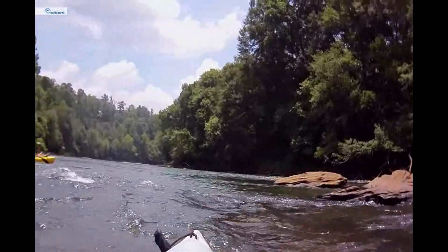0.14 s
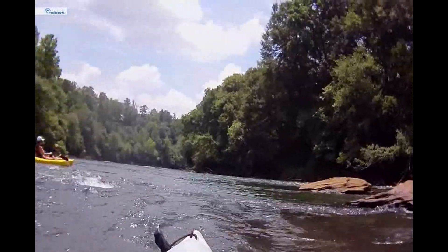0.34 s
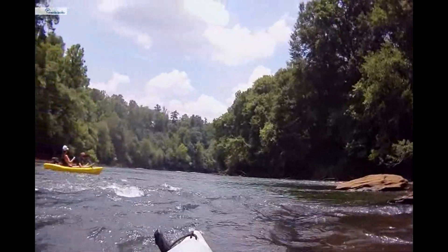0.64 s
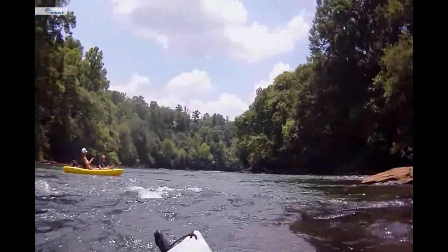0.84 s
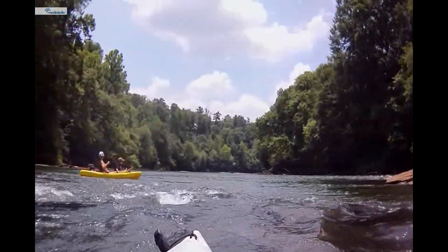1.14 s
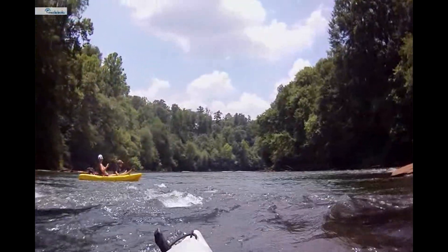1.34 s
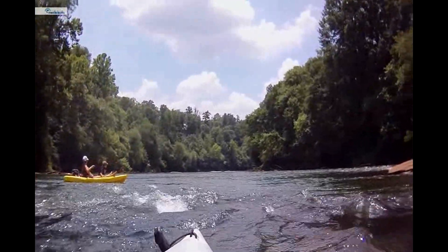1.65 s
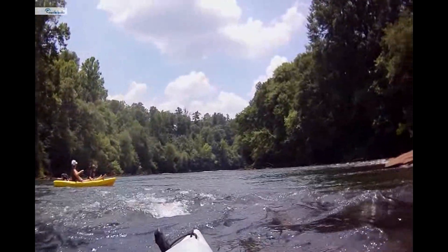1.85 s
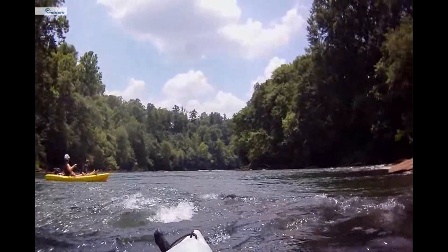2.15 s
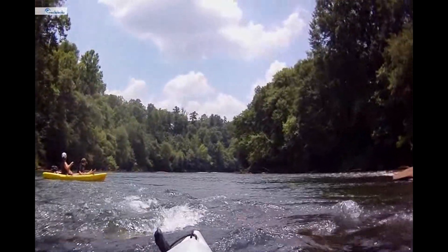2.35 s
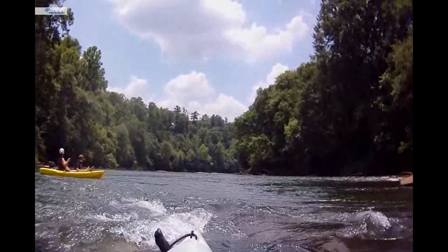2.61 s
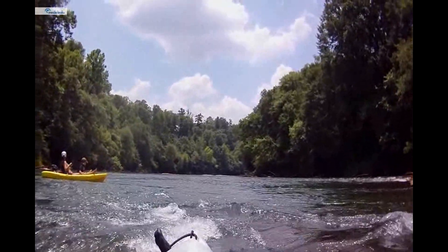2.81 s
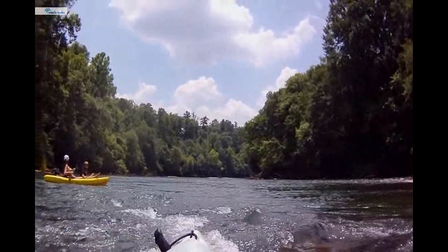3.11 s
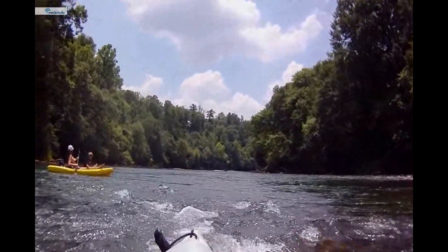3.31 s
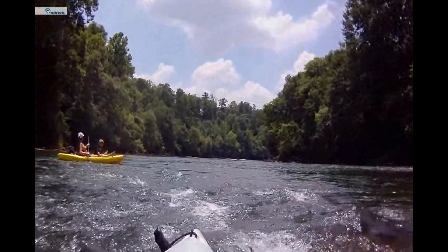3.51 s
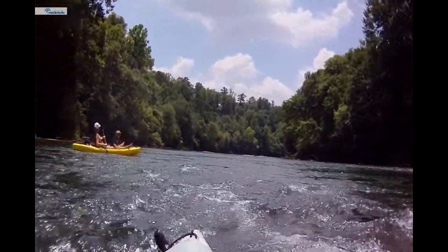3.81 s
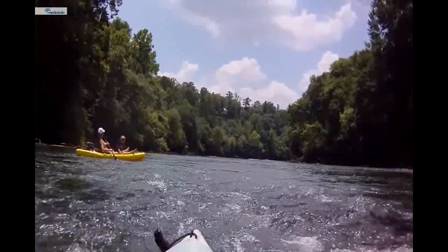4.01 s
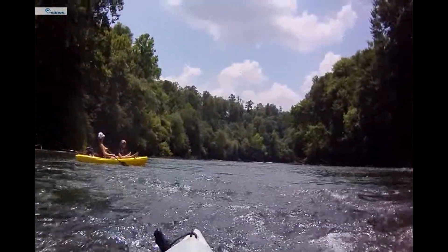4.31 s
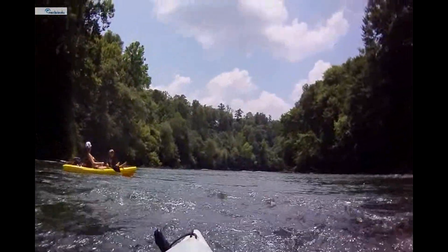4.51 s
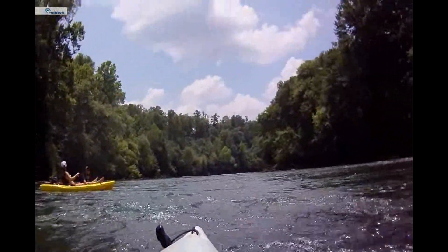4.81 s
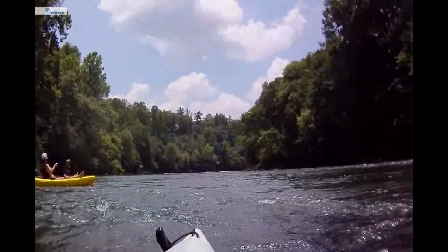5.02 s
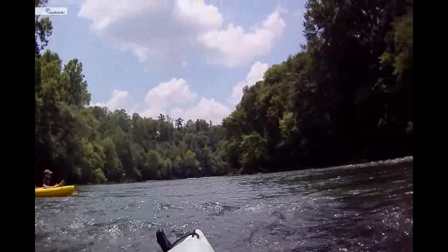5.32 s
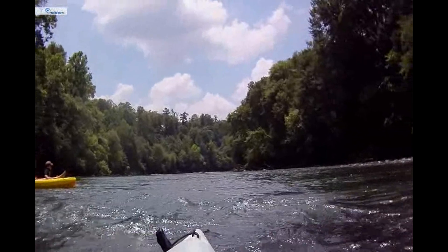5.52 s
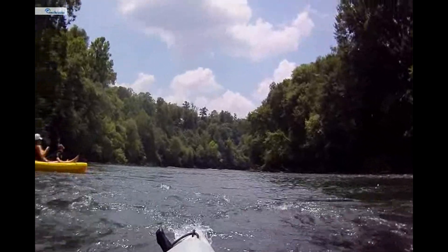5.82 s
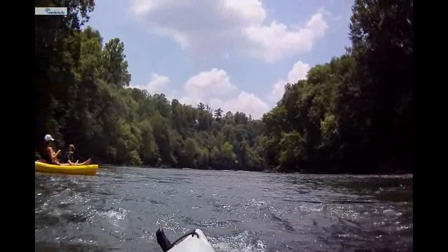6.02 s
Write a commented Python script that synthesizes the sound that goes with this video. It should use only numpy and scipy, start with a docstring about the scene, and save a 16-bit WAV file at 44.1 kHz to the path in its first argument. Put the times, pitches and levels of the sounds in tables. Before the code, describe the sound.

Outdoors on a river, a microphone in a sealed plastic case rides on a kayak deck. Throughout, a soft boxy wash of bubbling water and finer fizz runs over a low, surging rumble, with very faint hiss. At first it is fairly calm, with a few drips and a short slap and gurgle near 0.7 s. A flurry of plinking drops, slaps and gurgles comes around 1.1-1.4 s, then scattered drips and gurgles to 3 s. The fizz grows rougher and brighter, strongest around 4 s, with a deep double hull slap at about 4.2 s. At 4.8-4.95 s something hard chatters against the case: a rapid run of dry cracks, pings and boxy knocks over a low hull shudder, peaking near 4.87 s, by far the loudest event. Calmer water returns, with high glassy drips clustering around 5.4-5.6 s, and a final gurgle near 6.1 s.

```python
"""Water washes and fizzes over a low rumble, then drips, slaps and gurgles as a kayak drifts through rapids.
Wash and fizz mix drifting noise with crowds of bubbles; drops, slaps and gurgles are dying tones.
Late on, something hard chatters and knocks against the sealed plastic case of the microphone on the deck:
cracks, pings and boxy rings over a shudder of the hull. A faint hiss runs throughout."""
import sys
import numpy as np
from scipy import signal
from scipy.fft import rfft, irfft
from scipy.io import wavfile
from scipy.ndimage import uniform_filter1d

SR = 44100
rng = np.random.default_rng(int(sys.argv[2]) if len(sys.argv) > 2 else 0)


def output_pcm(signal):
    """Save a mono or channel-first signal as 16-bit PCM at the path in sys.argv[1].

    Samples are clipped to [-1, 1] before scaling.
    """
    pcm = np.clip(np.atleast_2d(signal).T, -1, 1) * 32767
    wavfile.write(sys.argv[1], SR, np.round(pcm).astype(np.int16))


N = 271203  # length in samples

# Relative spectra of the water, the wash boxy through the case: f/Hz, level/dB [per Hz]
RUMBLE_SPECTRUM = [(20, -18), (45, -2.5), (90, -5), (129, -9.5), (200, -12.5), (260, -10.5), (440, -120)]
WASH_SPECTRUM = [(200, -12.5), (248, -7), (366, -0.5), (423, -3), (525, 1.5), (582, 0.5), (680, -3),
                 (830, -10), (1050, -28), (1360, -68)]
CALM_FIZZ_SPECTRUM = [(590, -9), (1000, 1), (1470, 3), (2440, 2), (3190, -6.5), (4070, -7.5), (4730, -19.5),
                      (5830, -13.5), (6860, -32), (14400, -56), (16000, -60)]
ROUGH_FIZZ_SPECTRUM = [(590, -49), (1000, -6.5), (2100, -0.5), (3270, -3.5), (5380, -3.5), (6700, -20),
                       (7700, -24.5), (8450, -19.5), (9700, -29), (11300, -33), (14600, -53), (16000, -64)]
# Tiny droplets bursting, relative spectrum: f/Hz, level/dB [per Hz]
SPATTER_SPECTRUM = [(5000, 0), (8500, -10), (13000, -14)]
# How broken the water is: t/s, fizz level/dB, fizz colour [calm 0 to rough 1]
RAPIDS = [(0.0, -49.5, 0.057), (1.09, -49, 0.45), (1.37, -48.5, 0.48), (1.6, -49, 0.33), (1.85, -47, 0.84),
          (2.2, -47.5, 0.62), (2.77, -45.5, 0.71), (3.3, -45, 1.04), (3.61, -43.5, 0.9), (3.94, -41, 0.88),
          (4.559, -43, 0.88), (4.72, -48, 0.67), (5.04, -48.5, 0.17), (5.6, -48.5, 0.13), (6.15, -48, 0.55)]
# Waves along the hull swell wash and rumble: t/s, rumble rise level/dB, length/s [two standard deviations]
WAVES = [(0.75, 7, 0.2), (1.326, 7.5, 0.33), (1.917, 9, 0.23), (2.837, 5, 0.46), (4.32, 15, 0.34),
         (4.857, 28, 0.17), (6.15, 7, 0.082)]
# Microphone hiss, relative spectrum: f/Hz, level/dB [per Hz]
HISS_SPECTRUM = [(3000, -21), (8000, 4.5), (11000, -4.5), (15000, -3), (16000, -6.5)]
# Drops and small splashes: t/s, drop level/dB, f/Hz, spray level/dB
DROPS = [(0.2668, -33, 2440, -67), (0.32, -39, 1950, -50), (0.73, -42, 2020, -50), (1.141, -26, 2470, -54),
         (1.15, -34, 2020, -54), (1.186, -33, 3020, -67), (1.243, -32, 3250, -60), (1.286, -30, 2700, -54),
         (1.339, -29, 2470, -50), (1.3494, -22.5, 2270, -51), (1.354, -31, 4960, -62),
         (1.562, -46, 1970, -46), (1.59, -33, 2430, -46), (1.6044, -32, 2920, -47),
         (1.8503, -28, 2500, -52), (1.889, -32, 2070, -53), (1.9074, -26.5, 2940, -60),
         (2.2897, -38, 2530, -52), (2.447, -30, 2530, -44.5), (2.7074, -22, 1800, -42),
         (2.9377, -30, 1910, -47), (3.084, -25, 5000, -60), (3.391, -28, 2770, -59), (3.56, -26, 2200, -48),
         (4.1985, -24, 2070, -40.5), (4.992, -42, 6500, -56), (5.0, -31, 5600, -56),
         (5.041, -34, 3840, -56), (5.157, -32, 3800, -57), (5.255, -38, 4600, -55),
         (5.264, -34, 1830, -44.5), (5.266, -34, 5600, -60), (5.363, -32, 4080, -58),
         (5.374, -31, 5200, -60), (5.397, -29, 3680, -55), (5.432, -32, 4360, -66),
         (5.5258, -27, 5400, -60), (5.5338, -30, 6150, -54), (5.537, -24.5, 5330, -60),
         (5.5427, -26, 4440, -43), (5.5496, -26, 5370, -52), (5.5578, -21, 4750, -48),
         (5.543, -32, 1400, -54), (5.5572, -33, 2140, -50), (5.579, -37, 5500, -58),
         (5.782, -30.5, 1010, -48), (5.9752, -30, 2010, -44.5), (5.9967, -36, 2930, -50)]
# Waves slapping the hull: t/s, level/dB, f/Hz, t60/s
SLAPS = [(0.717, -31.5, 258, 0.064), (1.164, -31, 129, 0.047), (1.245, -41, 114, 0.28),
         (1.293, -34.5, 218, 0.08), (1.808, -38.5, 132, 0.14), (1.983, -40, 113, 0.2),
         (2.456, -41.5, 175, 0.14), (2.72, -42, 100, 0.22), (3.846, -41, 141, 0.16),
         (4.109, -33.5, 122, 0.25), (4.119, -35.5, 253, 0.2), (4.1617, -19, 118, 0.055),
         (4.182, -19.5, 102.4, 0.13), (4.352, -27.5, 115, 0.1), (4.94, -42, 61.4, 1),
         (5.575, -28, 169.8, 0.21), (6.068, -42.5, 145.4, 0.13)]
# Large bubbles at the hull: t/s, level/dB, f/Hz, t60/s [of the main tone]
GURGLES = [(0.739, -34.5, 420, 0.076), (1.163, -37, 577, 0.089), (1.256, -32, 250, 0.067),
           (1.3007, -27, 580, 0.031), (1.545, -30, 530, 0.03), (1.82, -31.5, 552, 0.088),
           (1.855, -35, 357, 0.063), (1.967, -28, 517, 0.069), (2.46, -30, 515, 0.11),
           (2.657, -32, 585, 0.044), (2.672, -33.5, 513, 0.12), (2.725, -35, 662, 0.047),
           (3.152, -26.5, 470, 0.036), (3.793, -33, 374, .056), (4.053, -30.5, 570, .056),
           (4.183, -25, 427, 0.047), (4.336, -28, 580, 0.13), (4.401, -26.5, 540, 0.054),
           (5.234, -33.5, 617, 0.032), (5.308, -33, 644, 0.083), (5.451, -32.5, 396, 0.095),
           (5.526, -31, 544, 0.061), (5.547, -23.5, 770, 0.033), (6.122, -24, 318, 0.037)]
# Hull shudder during the chatter: t/s, level/dB
SHUDDER = [(4.7697, -37), (4.79, -16.5), (4.801, -19), (4.82, -30.5), (4.848, -15), (4.861, -34),
           (4.875, -34), (4.94, -49)]
# Ticks of the knock: t/s, crack level/dB, favoured f/Hz, boxy ring level/dB, treble tilt [dB/octave]
TICKS = [(4.776, -50, 2530, -19, 3), (4.7859, -20.5, 3500, -29, -4.5), (4.7996, -17.5, 3750, -10, -7),
         (4.8167, -17, 4300, -9, -10), (4.8266, -21, 5700, -10, -5), (4.8297, -14, 3700, -18, -2),
         (4.8425, -13, 3300, -10, -3.5), (4.8665, -13.5, 3320, -25, -15), (4.8683, 0, 4650, -6, -1),
         (4.8802, -11, 4400, 4.5, -3), (4.8851, -2, 3050, 4, -9), (4.896, -20, 3120, -24, -14),
         (4.909, -25, 3800, -7.5, -8.5), (4.9225, -35, 5600, -20, -1), (4.9315, -40, 5600, -29, 0),
         (4.945, -32, 4000, -41, -8)]
# Relative spectrum of a crack: f/Hz, level/dB [per Hz]
CRACK_SPECTRUM = [(530, -9), (1200, -10.5), (2350, -11), (3400, -7), (5500, -6.5), (7900, -13.5),
                  (14700, -36), (16400, -42)]
# Low modes of the case: f/Hz, level/dB, t60/s
CASE_MODES = [(267, -21.5, 0.088), (457, -20, 0.024), (544, -5, 0.032), (760, -16, 0.03), (870, -21, 0.014)]
# High modes of the case: f/Hz, level/dB
PING_MODES = [(1560, -2), (2250, -13.5), (3050, 1.5), (3700, -4), (4400, -8.5), (5600, -8.5), (6900, -10),
              (7850, -12)]

CALM_DB = -50  # fizz level of calm water
# Calm level in dB, dB per dB of fizz, dB per dB of wave, slow growth downstream
WASH_DB, WASH_FOLLOWS, WASH_WAVE, WASH_DRIFT_DB_PER_S = -47.5, 0.55, 0.21, 0.5
RUMBLE_DB, RUMBLE_FOLLOWS, RUMBLE_DRIFT_DB_PER_S = -61, 0.09, 0.95
HISS_DB = -76
SHUDDER_HZ, JOLT_S, JOLT_DB = 69, 0.00044, 7  # jolt: width, level above the shudder
CRACK_S = 0.00094  # time scale of a crack and of the onset of a ping
PING_T60, PING_FALL_DB, PING_DB = 0.010, 17, -1  # s; dB per octave off the favoured pitch; level re the tick
WATER_EDGE_HZ, EDGE_HZ = 15300, 16500  # top of the water and hiss, top of everything


def amp(db):
    """Turns decibels into a linear gain."""
    return 10 ** (np.asarray(db) / 20)


def unit(x):
    """Scales to rms 1."""
    return x / np.sqrt(np.mean(abs(x) ** 2) + 1e-20)


def read(points, hz):
    """Reads a spectrum on a log-frequency axis."""
    f, value = np.transpose(points)
    return np.interp(np.log(hz + 1), np.log(f + 1), value)


def add(mix, s, sound):
    """Lays a sound into the mix at s seconds, cut off at the end."""
    part = mix[round(s * SR):][:len(sound)]
    part += sound[:len(part)]


def low_pass(x, edge_hz):
    """Cuts everything above the edge with a steep linear-phase filter."""
    taps = signal.firwin(511, edge_hz, window=("kaiser", 9), fs=SR)
    return signal.oaconvolve(x, taps, "same")


def ring(hz, t60, rise=0., cycles=0.67, size=8000):
    """A dying tone of peak near 1: pitch climbs if rise is positive, sags if negative; cycles blunt its onset."""
    t = np.arange(size) / SR
    turns = hz * t * (1 + rise * np.minimum(t / t60, 1))
    onset = 1 - np.exp(-(t * hz / cycles) ** 2)
    return amp(-60 * t / t60) * onset * np.sin(2 * np.pi * turns)


def noise(colour, size, patch_db, patch_s, patch_hz, flicker_db, flicker_s):
    """Random short-time spectra with drifting patches and surges shared by all pitches; rms 1."""
    hop = size // 4
    frames, hz = N // hop + 5, np.fft.rfftfreq(size, 1 / SR)

    def frames_in(seconds):
        return max(int(seconds * SR / hop), 1)

    real, imag, patches = rng.standard_normal((frames, len(hz), 3)).T
    patches = uniform_filter1d(patches, max(int(patch_hz * size / SR), 1), axis=0)
    patches = unit(uniform_filter1d(patches, frames_in(patch_s), axis=1))
    flicker = unit(uniform_filter1d(rng.standard_normal(frames), frames_in(flicker_s)))
    t = np.arange(frames) * hop / SR
    shape = amp(colour(hz[:, None], t))
    shape = shape / np.sqrt((shape ** 2).mean(axis=0))
    spectra = (real + 1j * imag) * shape * amp(patch_db * patches + flicker_db * flicker)
    return unit(signal.istft(spectra, nperseg=size, noverlap=size - hop)[1][:N])


def bubbles(points, lo_hz, hi_hz, per_s, spread_db, cycles, rise, swell, clump, count=24):
    """A crowd of bubbles of many sizes, born in clumps, a few much louder than the rest; rms 1."""
    out = np.zeros(N)
    drift = uniform_filter1d(uniform_filter1d(rng.standard_normal(N), size=900), size=900)
    busy = np.exp(clump * unit(drift))
    busy = busy / busy.mean()
    for hz in np.geomspace(lo_hz, hi_hz, count):
        born, train = rng.random(N) < busy * per_s / count / SR, np.zeros(N)
        train[born] = amp(spread_db * np.minimum(rng.exponential(size=born.sum()), 4))
        bubble = ring(hz, cycles / hz, rise, swell, size=int(cycles / hz * SR) + 1)
        # wider pitch steps and shorter rings higher up: hz keeps the level per hertz
        out += amp(read(points, hz)) * hz * signal.oaconvolve(train, bubble)[:N]
    return unit(out)


def rumble():
    """Deep rumble of the water: slowly surging low noise, rms 1."""
    return noise(lambda hz, at: read(RUMBLE_SPECTRUM, hz) + 0 * at, 2048, patch_db=1.8, patch_s=0.1,
                 patch_hz=60, flicker_db=0.49, flicker_s=0.078)


def wash():
    """Boxy wash: noise and a crowd of mid-sized bubbles."""
    smooth = noise(lambda hz, at: read(WASH_SPECTRUM, hz) + 0 * at, 1024, patch_db=1.0, patch_s=0.05,
                   patch_hz=200, flicker_db=0.03, flicker_s=0.038)
    crowd = bubbles(WASH_SPECTRUM, 231.6, 855, per_s=700, spread_db=3.5, cycles=15.7,
                    rise=0.12, swell=2.2, clump=0.6)
    return 0.77 * smooth + 0.61 * crowd


def fizz(fizz_db):
    """Fizz of broken water: noise coloured from calm to rough, small bubbles, trickles and bursting droplets."""
    s, _, colour = np.transpose(RAPIDS)

    def fizz_colour(hz, at):
        rough = np.clip(np.interp(at, s, colour), 0, 1.25)
        return (1 - rough) * read(CALM_FIZZ_SPECTRUM, hz) + rough * read(ROUGH_FIZZ_SPECTRUM, hz)

    smooth = noise(fizz_colour, 256, patch_db=1.15, patch_s=0.062, patch_hz=1200,
                   flicker_db=0.46, flicker_s=0.028)
    lively = np.clip(0.65 + 0.39 * (fizz_db - CALM_DB), 0, 1.5)  # stronger fizz has louder bubbles
    crowd = bubbles(ROUGH_FIZZ_SPECTRUM, 1222, 9060, per_s=4000, spread_db=3.8, cycles=24.0,
                    rise=0.065, swell=3.2, clump=0.5)
    trickles = bubbles(CALM_FIZZ_SPECTRUM, 1034, 4610, per_s=200, spread_db=2.7, cycles=20.0,
                       rise=0.17, swell=2.1, clump=0.8, count=12)
    spatter = bubbles(SPATTER_SPECTRUM, 7200, 12500, per_s=55, spread_db=2.6, cycles=19.0,
                      rise=0.05, swell=2.5, clump=0.17, count=6)
    return 0.68 * smooth + lively * (0.31 * crowd + 0.0087 * spatter) + 0.25 * trickles


def water():
    """Rides the rumble, wash and fizz levels: wash and rumble follow the fizz and swell with passing waves."""
    s, level_db, _ = np.transpose(RAPIDS)
    t = np.arange(N) / SR
    fizz_db = np.interp(t, s, level_db)
    wave_db = sum(db * np.exp(-(2 * (t - at) / length) ** 2 / 2) for at, db, length in WAVES)
    broken_db = fizz_db - CALM_DB
    wash_db = WASH_DB + WASH_FOLLOWS * broken_db + WASH_WAVE * wave_db + WASH_DRIFT_DB_PER_S * t
    rumble_db = RUMBLE_DB + RUMBLE_FOLLOWS * broken_db + wave_db + RUMBLE_DRIFT_DB_PER_S * t
    return rumble() * amp(rumble_db) + wash() * amp(wash_db) + fizz(fizz_db) * amp(fizz_db)


def hiss():
    """Steady microphone hiss: noise shaped by a fixed spectrum."""
    colour = amp(read(HISS_SPECTRUM, np.fft.rfftfreq(N, 1 / SR)))
    return amp(HISS_DB) * unit(irfft(rfft(rng.standard_normal(N)) * colour, N))


def drops():
    """Each drop rings as two close rising tones amid smaller droplets and a puff of spray."""
    out, t = np.zeros(N), np.arange(2048) / SR
    bins = np.fft.rfftfreq(2048, 1 / SR)
    for s, db, hz, spray_db in DROPS:
        tones = 0.71 * ring(hz, 36 / hz, 0.022, 2.1, size=2048)
        tones += 0.68 * ring(0.905 * hz, 22 / hz, 0.11, 2.6, size=2048)
        add(out, s, amp(db) * tones)
        for late, pitch, size in rng.standard_normal((4, 3)):  # droplets thrown up around the drop
            f = hz * np.exp(0.25 * pitch)
            # the case mutes the highest
            dull_db = min(read(ROUGH_FIZZ_SPECTRUM, f) - read(ROUGH_FIZZ_SPECTRUM, hz), 0)
            droplet = ring(f, 25 / hz, 0.068, 2.3, size=1024)
            add(out, s + 0.007 * late, amp(db - 12.5 + 3.3 * size + dull_db) * droplet)
        # the spray favours pitches around 2.6 times that of its drop
        octaves_off = abs(np.log2(bins / (2.6 * hz) + 0.01))
        colour = amp(read(ROUGH_FIZZ_SPECTRUM, bins) - 3.5 * octaves_off)
        puff = unit(irfft(rfft(rng.standard_normal(2048)) * colour)) * np.exp(-(t / 0.0035 - 1.3) ** 2)
        add(out, s - 0.004, amp(spray_db) * puff)  # builds up just before the drop rings
    return out


def slaps():
    """Waves slap the hull: low tones that sag in pitch as they die."""
    out = np.zeros(N)
    for s, db, hz, t60 in SLAPS:
        add(out, s, amp(db) * ring(hz, t60, -0.038, 0.27, size=16000))
    return out


def gurgles():
    """Large bubbles: a rising tone after a blunt start, with a short steady tone above it."""
    out = np.zeros(N)
    for s, db, hz, t60 in GURGLES:
        tones = 1.06 * ring(hz, t60, 0.065, 0.4) + 0.38 * ring(1.34 * hz, 0.015, 0., 0.22)
        add(out, s, amp(db) * tones)
    return out


def shudder():
    """The hull shudders as a low sine, with the boxy noise and thin gritty hiss of rubbing."""
    out = np.zeros(N)
    s, db = np.transpose(SHUDDER)
    t = np.arange(s[0], s[-1], 1 / SR)
    bins = np.fft.rfftfreq(len(t), 1 / SR)
    boxy, gritty = rfft(rng.standard_normal((len(t), 2)), axis=0).T
    scrape = 0.37 * unit(irfft(boxy * amp(read(WASH_SPECTRUM, bins)), len(t)))
    scrape += 0.024 * unit(irfft(gritty * amp(read(ROUGH_FIZZ_SPECTRUM, bins)), len(t)))
    sway = np.sin(2 * np.pi * SHUDDER_HZ * (t - s[0]))
    add(out, s[0], amp(np.interp(t, s, db)) * (sway + scrape) * signal.windows.tukey(len(t), 0.1))
    return out


def knock():
    """Each tick is a crack with a duller rattle, a ping, the boxy ring of the case and a jolt of the hull."""
    out, t, bins = np.zeros(N), np.arange(4096) / SR, np.fft.rfftfreq(4096, 1 / SR)
    octaves = np.log2(bins / 3000 + 0.34)  # about 3 kHz, levelling off in the bass
    for s, db, hz, box_db, tilt_db in TICKS:
        grit = rng.standard_normal(4096)
        # each tick lands elsewhere and stirs the modes a little differently
        box = sum(amp(level + 1.0 * luck) * ring(f, t60, 0., 0.81, size=4096)
                  for (f, level, t60), luck in zip(CASE_MODES, grit))
        colour = amp(read(CRACK_SPECTRUM, bins) + tilt_db * octaves)
        # every pitch arrives once, its delay scattered around twice CRACK_S
        scatter = unit(uniform_filter1d(grit, size=50))[:len(bins)]
        delay_s = CRACK_S * np.maximum(2 + 0.5 * scatter, 1)
        crack = irfft(colour * np.exp(-2j * np.pi * np.cumsum(delay_s) * bins[1]))
        crack = crack * np.exp(-(t / 0.01) ** 4) / abs(crack).max()
        rattle = unit(irfft(rfft(grit) * colour * amp(-6 * np.maximum(octaves, 0))))
        rattle = rattle * np.exp(-t / 0.0074) * np.minimum(t / 0.0025, 1)
        ping = 0
        for (f, level), luck in zip(PING_MODES, grit[::-1]):
            mode_db = level + 3.0 * luck - PING_FALL_DB * abs(np.log2(f / hz))
            ping = ping + amp(mode_db) * ring(f, PING_T60, 0., f * CRACK_S, size=4096)
        add(out, s, amp(db) * (0.85 * crack + 0.07 * rattle + amp(PING_DB) * ping) + amp(box_db) * box)
        jolt_db = np.interp(s, *np.transpose(SHUDDER)) + JOLT_DB
        add(out, s, amp(jolt_db) * np.exp(-(t / JOLT_S - 2) ** 2))
    return out


def scene():
    """Water and hiss lose their extreme treble; the shudder and knock come in on top."""
    flow = water() + hiss() + drops() + slaps() + gurgles()
    return (low_pass(flow, WATER_EDGE_HZ) + shudder() + knock())[None]


def record(dry):
    """The input saturates smoothly towards 0.6 of full scale; then the band limit."""
    return low_pass(0.6 * np.tanh(dry[0] / 0.65), EDGE_HZ)[None]


dry = scene()
out = record(dry)
output_pcm(out)
```